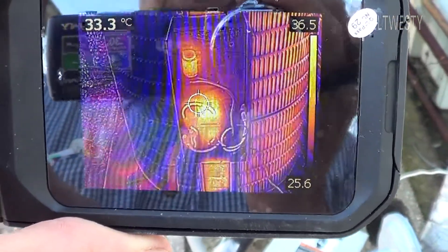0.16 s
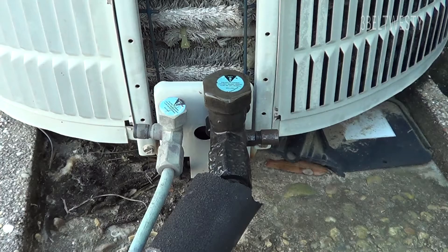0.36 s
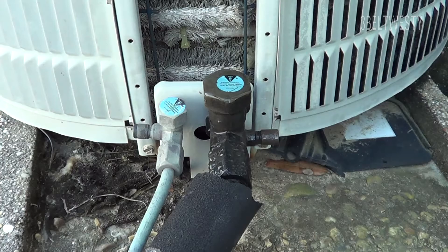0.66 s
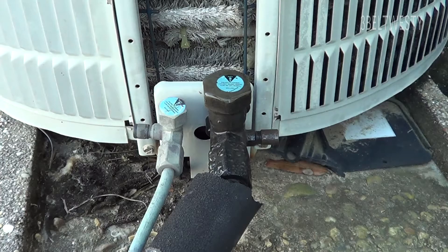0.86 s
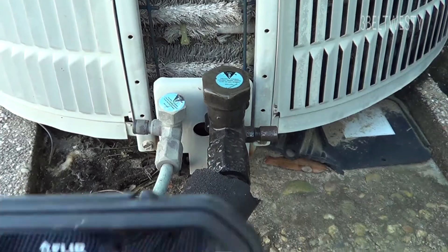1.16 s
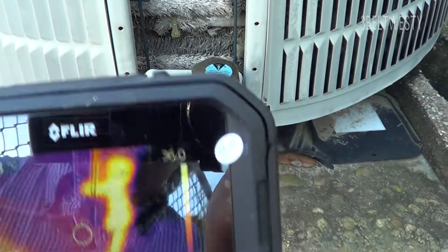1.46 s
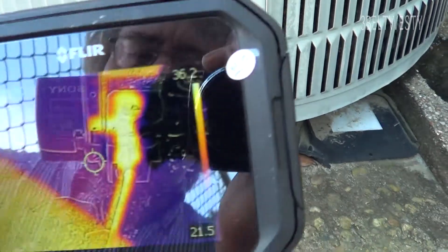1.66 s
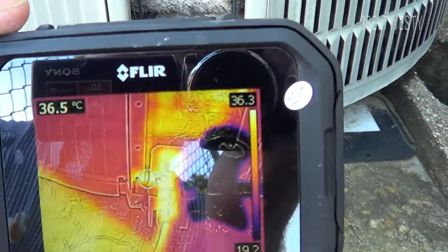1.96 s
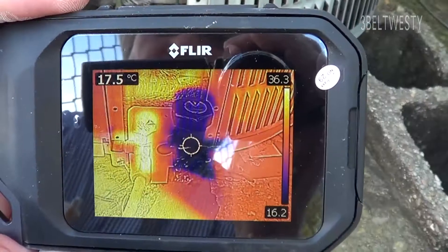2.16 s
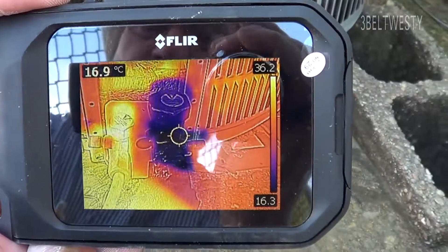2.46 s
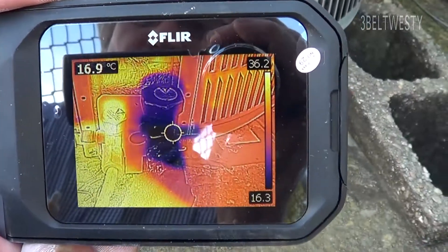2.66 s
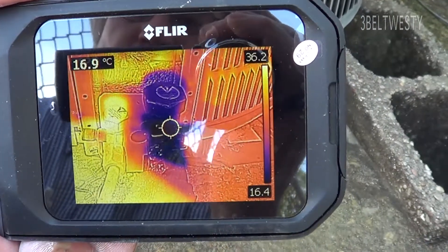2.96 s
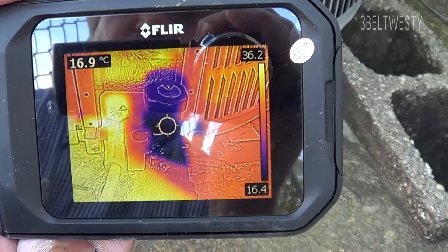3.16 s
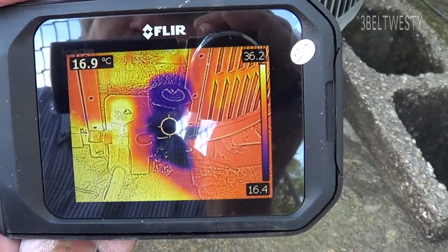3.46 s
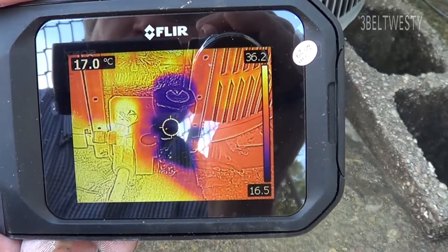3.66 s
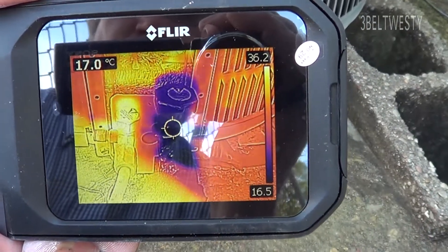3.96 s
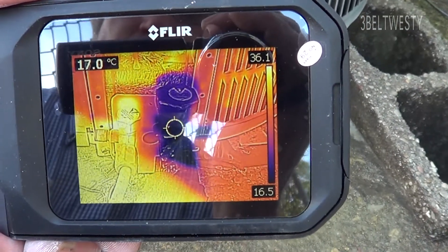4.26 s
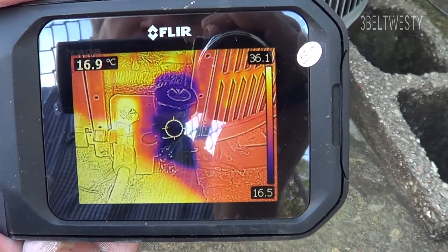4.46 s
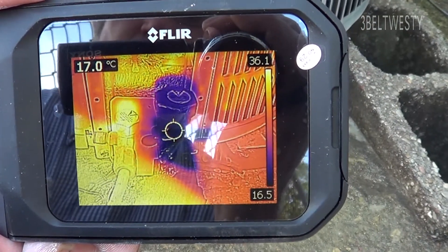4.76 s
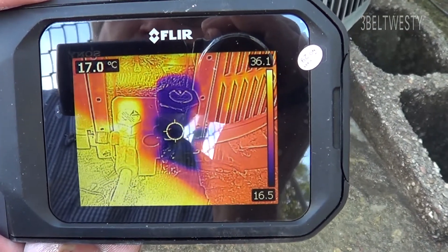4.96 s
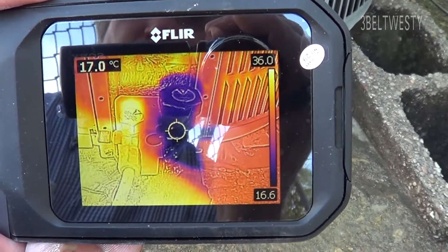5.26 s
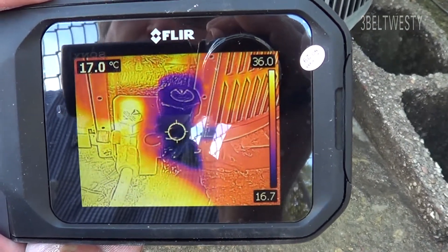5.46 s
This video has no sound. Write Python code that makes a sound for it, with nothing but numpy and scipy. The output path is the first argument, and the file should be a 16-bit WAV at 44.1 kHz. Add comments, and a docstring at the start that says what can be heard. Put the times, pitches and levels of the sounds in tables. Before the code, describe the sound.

A fan unit blows continuously near the microphone, its broad airy roar mixed with motor hum, electrical buzz and slightly throbbing compressor whine. Soft low gusts buffet the first two passages. Two very short complete silences separate three microphone positions; the tone shifts subtly as a held object comes near, and the last, longest passage is steady and wind-free.

```python
"""An outdoor air-conditioner runs steadily, heard close by from three microphone positions in turn.
At the first, noise shaped by cabinet resonances makes the fan's rush; sine tones make the fan motor's hum,
the mains buzz and the throbbing compressor; low noise in opposite phase makes the buffeting wind.
A short silence follows, then the second position, where a hand-held object rises and alters the tones
while gusts go on; after another silence the third position is heard without wind to the end."""
import sys
import numpy as np
from scipy import signal
from scipy.fft import rfft, irfft, next_fast_len
from scipy.io import wavfile
from scipy.ndimage import uniform_filter1d

SR = 44100
rng = np.random.default_rng(int(sys.argv[2]) if len(sys.argv) > 2 else 0)


def persist_wave(psi):
    """Save psi, clipped to +-1, as 16-bit WAV."""
    counts = np.round(np.clip(psi, -1, 1) * 32767).astype(np.int16)
    wavfile.write(sys.argv[1], SR, np.atleast_2d(counts).T)


N = 247401
T = np.arange(N) / SR  # time in s
MAINS_HZ, COMPRESSOR_HZ = 59.997, 58.39  # mains frequency; shaft speed in turns per second
EDGE_HZ = 15700  # upper limit of the sound band
BREEZE_DB, GUST_RISE_S = -42, .03  # wind level between gusts; time scale of a gust's swell

# All source levels are those before the gain control in record().
# Sounding span of each microphone position: start_s, end_s
POSITION_SPANS = [(-1, .221), (.3335, 1.98575), (2.1715, 9)]
# Passage of the hand-held object from clear to shading the microphone: start_s, end_s
SHADING_SPAN = (.85, 1.35)
# Spectrum of the wind noise: frequency_hz, relative_density_db (per Hz)
WIND_SPECTRUM = [(15, -25.5), (40, -14.5), (75, -6.5), (115, 2.5), (200, 0.5), (300, -10), (450, -19),
                 (800, -49)]
# Gusts of wind from the fan on the microphone: peak_s, level_db, fall_s
WIND_GUSTS = [(.13, -39, .05), (.4, -32, .05), (.48, -31, .05), (.57, -34, .07), (.85, -38, .1),
              (1.03, -34, .04), (1.16, -31, .03), (1.45, -42, .04), (1.62, -26, .025), (1.74, -34, .05),
              (1.93, -37, .04)]
# Compressor tones: shaft_multiple, first_db, second_open_db, second_shaded_db, third_db, left_minus_right_db
SHAFT_TONES = [(23, -40, -39, -42, -43, -1), (59, -63, -46, -49, -42, -2), (67, -50, -55, -51, -49, -4),
               (73, -66, -55, -67, -50, 0), (134, -69, -56, -63, -51, 1), (143, -67, -53, -54, -56, 2),
               (147, -64, -52, -58, -55, 7), (155, -63, -52, -52, -51, -2), (156, -67, -67, -57, -52, 3),
               (165, -69, -43, -47, -55, 4), (166, -69, -43, -50, -51, 1), (167, -53, -49, -51, -54, 1),]
# Strongest buzz partials: multiple_of_twice_mains, then the same five level columns in dB
BUZZ_PARTIALS = [(14, -55, -43, -46, -43, 1), (20, -45, -49, -46, -45, 2), (23, -43, -56, -56, -58, 0),
                 (31, -55, -52, -52, -48, 0), (48, -47, -59, -54, -53, 3), (50, -51, -51, -51, -48, 3),
                 (51, -42, -49, -51, -47, 8), (52, -69, -43, -49, -44, 2), (53, -43, -46, -49, -49, 7),
                 (54, -46, -43, -44, -55, 8), (55, -51, -59, -56, -50, 5), (56, -52, -51, -45, -47, 5),
                 (57, -49, -59, -55, -50, 8), (59, -51, -48, -53, -57, 8), (60, -42, -59, -45, -41, 6),
                 (61, -52, -46, -52, -40, 4), (62, -43, -44, -44, -61, 8), (63, -54, -49, -70, -47, 0),
                 (64, -55, -54, -50, -74, 5), (65, -68, -49, -51, -49, 3), (66, -44, -53, -50, -49, 3),
                 (67, -49, -63, -57, -52, 7), (68, -66, -47, -52, -47, 4), (69, -47, -51, -52, -46, 5),
                 (71, -49, -53, -52, -64, 7), (78, -47, -60, -71, -52, -1), (80, -73, -54, -61, -50, -3),
                 (81, -52, -57, -63, -48, 6), (82, -51, -48, -45, -49, 5), (84, -45, -50, -47, -57, 1),
                 (85, -49, -72, -50, -70, 2), (87, -49, -48, -55, -58, 0)]
# Outline about which the weaker buzz partials scatter: frequency_hz, level_db
WEAK_BUZZ_OUTLINE = [(2500, -62.5), (4500, -58.5), (6000, -63.5), (8400, -59), (10000, -55), (11000, -61),
                     (12500, -67), (13800, -65), (15500, -73)]
# Fan motor hum and neighbouring tones: frequency_hz, then the same five level columns in dB
FAN_TONES = [(216.3, -47, -47, -47, -46, 0), (615.5, -42, -34, -34, -34, 1), (624, -45, -34, -34, -42, 1),
             (627, -45, -40, -40, -36, 2), (631.2, -27, -24, -24, -23, 2), (638, -40, -31, -31, -37, 2),
             (649.2, -38, -30, -30, -28.5, 1), (663, -45, -35, -35, -37, 1), (692, -40, -35, -35, -38, 1),
             (703.4, -34, -40, -40, -34, 1), (1088.9, -49, -52, -52, -42, 0),
             (1122.8, -42, -45, -45, -42, 2), (1147.5, -46, -41, -41, -39, 2),
             (1183.7, -44, -44, -44, -43, -2), (1201.5, -47, -55, -55, -46, 2),
             (1219.7, -45, -51, -51, -45, -1), (1255.7, -38, -43, -43, -38, 2),
             (1262.4, -43, -41, -41, -42, 0), (1813, -46, -46, -46, -40, 1), (1827, -46, -41, -41, -43, 1),
             (2043.6, -48, -44, -44, -44, 0)]
# Spectrum of the air rush, one list per position: frequency_hz, relative_density_db (per Hz)
RUSH_SPECTRA = [
    [(18, -85), (30, -48), (213, -12), (270, -17), (421, -11.5), (519, -18.5), (561, -8.5), (692, -3.5),
     (830, -14.5), (1230, -12), (1480, -19.5), (2360, -23.5), (2560, -29), (10500, -30.5), (15500, -54)],
    [(18, -72), (30, -44), (103, -20), (178, -18.5), (292, -10), (443, -13), (591, -6.5), (639, -4),
     (898, -11), (2130, -19), (2560, -24.5), (3320, -26.5), (8970, -30.5), (9960, -28.5), (15500, -57)],
    [(18, -73), (30, -47), (103, -19), (182, -18.5), (284, -9.5), (492, -12.5), (639, -4), (1020, -13),
     (1870, -17), (2560, -24), (3320, -26.5), (5750, -29.5), (7470, -29), (9960, -31.5), (15500, -55)],
]
# Rms of the rush before patches and flicker, one per position: level_db
RUSH_LEVELS = [-16, -16, -16]
# Cabinet and grille resonances and hollows in the rush: frequency_hz, width_hz, lift_db
CABINET_MODES = [(283, 90, 2), (484, 55, -7), (632.5, 25, 4.5), (755, 60, 4), (977, 32, 3), (1303, 62, -1),
                 (1680, 60, -3.5), (1823, 50, 7.5), (1950, 60, 1.5), (2086, 210, 4.5), (2224, 80, 4),
                 (2540, 200, -2.5), (3390, 330, 4.5), (3300, 50, 3.5), (3760, 180, 3), (8400, 300, -2.5),
                 (9800, 300, 5), (13800, 700, 4), (14500, 500, -5.5)]
# Treble lifts and hollows of each position, one list per position: frequency_hz, width_hz, lift_db
LOCAL_MODES = [
    [(2900, 500, 0.5), (3450, 200, -3.5), (9800, 700, -4), (11800, 400, -4), (12250, 300, 4.5),
     (13000, 400, -4), (13900, 400, -4), (14700, 700, 4)],
    [(9900, 370, -1.5), (11200, 700, -1.5), (13000, 300, -2), (14800, 1500, 3)],
    [(12900, 300, -2), (14250, 300, -6), (14850, 300, 1), (15300, 400, -6)],
]
# Left-right likeness of the rush: frequency_hz, correlation (no unit, held at 1)
PORT_LIKENESS = [(40, 0.81), (100, 0.94), (250, 0.96), (400, 0.75), (640, 0.92), (1100, 0.75), (1800, .88),
                 (2500, 0.8), (3200, 0.81), (7500, 0.62), (10200, 0.81), (11200, 1.07)]
# Level difference between the ports in the rush: frequency_hz, left_minus_right_db
PORT_LEAN = [(60, 0.5), (130, 1.5), (220, -0.2), (400, -1.5), (800, 1.2), (1500, .2), (3200, -0.5),
             (6000, -1), (11000, 0)]
# Phase lead of the left port: frequency_hz, lead_rad
PORT_LEAD = [(40, .17), (120, 0.27), (250, 0.23), (420, .53), (860, 0.4), (1810, .2), (3400, 0.23),
             (6000, 0.18), (8000, 0)]

PORT_SIGNS = np.array([[.5], [-.5]])  # shares a left-right difference between the two ports


def gain_of(db):
    """Logarithmic level: decibels become an amplitude ratio."""
    return 10 ** (np.asarray(db) / 20)


def evened(x):
    """Normalisation: the signal is scaled to rms 1."""
    return x / np.sqrt(np.mean(x ** 2) + 1e-20)


def read(points, hz):
    """Interpolation of a frequency table on a nearly logarithmic axis."""
    f, value = np.transpose(points)
    return np.interp(np.log(hz + 1), np.log(f + 1), value)


def bumps(modes, hz):
    """Resonance: each mode lifts or lowers the level in dB along a Lorentzian curve."""
    return sum(db / (1 + (2 * (hz - f) / width) ** 2) for f, width, db in modes)


def position(t):
    """Succession: index of the microphone position, changing 40 ms into each silence."""
    ends = [POSITION_SPANS[0][1], POSITION_SPANS[1][1]]
    return np.searchsorted(ends, t - .04)


def drift(hz):
    """Random modulation: sines up to hz in random phase sum to a fluctuation of rms 1."""
    rates = np.geomspace(hz / 20, hz, 20)[:, None]
    coarse = np.arange(0, T[-1] + .02, .01)
    phase = 2 * np.pi * (rates * coarse + rng.random(rates.shape))
    wave = (np.sin(phase) / np.sqrt(rates)).sum(0)
    return np.interp(T, coarse, evened(wave))


def tone(hz, db, lean_db):
    """Simple harmonic motion: a sine reaches two ports with a level and a phase difference."""
    phase = 2 * np.pi * (hz * T + rng.random())
    amplitude = np.sqrt(2) * gain_of(db + PORT_SIGNS * lean_db)
    return amplitude * np.sin(phase + PORT_SIGNS * read(PORT_LEAD, hz))


def tones(rows, unit_hz, waver_db, waver_hz):
    """Superposition: steady partials add, each wavering about a level set by position and shading."""
    where = position(T)
    shaded = np.interp(T, SHADING_SPAN, [0, 1])
    column = np.where(where == 1, 1 + shaded, 3 * (where == 2))
    total = 0
    for multiple, *levels_db, lean_db in rows:
        level_db = np.interp(column, range(len(levels_db)), levels_db)
        level_db = level_db + waver_db * drift(waver_hz)
        total = total + tone(unit_hz * multiple, level_db, lean_db)
    return total


def wind(lumpy_db=2.5):
    """Wind pressure on a microphone: lumpy low noise, breeze and gusts, in opposite phase at the ports."""
    size = next_fast_len(N)
    colour = gain_of(read(WIND_SPECTRUM, np.fft.rfftfreq(size, 1 / SR)))
    low = irfft(rfft(rng.standard_normal(size)) * colour, size)[:N]
    # the breeze lasts to the end of the second position
    level = gain_of(BREEZE_DB) * (T < POSITION_SPANS[1][1])
    for peak_s, db, fall_s in WIND_GUSTS:
        spread_s = np.where(T < peak_s, GUST_RISE_S, fall_s)
        level = level + gain_of(db) * np.exp(-((T - peak_s) / spread_s) ** 2)
    level = level * gain_of(lumpy_db * drift(40))
    return np.array([[1], [-1]]) * level * evened(low)


def compressor(depth=0.25):
    """Amplitude modulation: shaft multiples throb at twice the slip between field and rotor."""
    slip_hz = MAINS_HZ - COMPRESSOR_HZ
    throb = 1 + depth * np.sin(2 * np.pi * 2 * slip_hz * T)
    return evened(throb) * tones(SHAFT_TONES, COMPRESSOR_HZ, waver_db=1.5, waver_hz=2.6)


def buzz(scatter_db=3.0):
    """Magnetic vibration: laminations shake at twice the mains rate, a comb strongest in the treble."""
    comb_hz = 2 * MAINS_HZ
    scatter = scatter_db * rng.standard_normal((131, 4))
    strong = [row[0] for row in BUZZ_PARTIALS]
    weak = [(k, *(read(WEAK_BUZZ_OUTLINE, comb_hz * k) + scatter[k]), 0)
            for k in range(21, 131) if k not in strong]
    return tones(list(BUZZ_PARTIALS) + weak, comb_hz, waver_db=.7, waver_hz=5)


def fan_motor():
    """Line spectrum of a rotating machine: a strong hum among weaker neighbouring tones."""
    return tones(FAN_TONES, 1, waver_db=2.0, waver_hz=5)  # the table is in Hz


def rush(patchy_db=1.07, flicker_db=0.45):
    """Turbulence: random short-time spectra, filtered by resonances, with patches and a shared flicker."""
    window, hop = 2048, 512  # samples
    frames, hz = N // hop + 5, np.fft.rfftfreq(window, 1 / SR)
    t = np.arange(frames) * hop / SR
    a, b, c, d, patches = rng.standard_normal((frames, len(hz), 5)).T
    patches = uniform_filter1d(patches, size=20, axis=0)  # across frequency
    patches = evened(uniform_filter1d(patches, size=6, axis=1))  # across time

    colours = []
    for spectrum, db, local in zip(RUSH_SPECTRA, RUSH_LEVELS, LOCAL_MODES):
        shape = gain_of(read(spectrum, hz) + bumps(CABINET_MODES + local, hz))
        colours.append(gain_of(db) * evened(shape * (hz < EDGE_HZ)))

    # the right port shares part of the left noise and adds its own
    same = np.clip(read(PORT_LIKENESS, hz), -1, 1)[:, None]
    left = a + 1j * b
    right = same * left + np.sqrt(1 - same ** 2) * (c + 1j * d)
    lean = gain_of(PORT_SIGNS * read(PORT_LEAN, hz))
    lead = np.exp(1j * PORT_SIGNS * read(PORT_LEAD, hz))
    spectra = np.array([left, right]) * (lean * lead)[:, :, None]

    overlap = window - hop
    plain = 1 / np.std(signal.istft(left, nperseg=window, noverlap=overlap)[1])  # flat noise to rms 1
    spectra *= plain * np.array(colours).T[:, position(t)] * gain_of(patchy_db * patches)
    air = signal.istft(spectra, nperseg=window, noverlap=overlap)[1][:, :N]
    return gain_of(flicker_db * drift(30)) * air


def scene():
    """Superposition of wind, compressor, mains buzz, fan motor and rushing air."""
    return wind() + compressor() + buzz() + fan_motor() + rush()


def record(dry, hold_db=-15.0, share=0.8, smooth_s=0.0085):
    """Level compression: a quick gain control, then silences between positions and a band limit."""
    keep = np.exp(-1 / (smooth_s * SR))
    start_power = gain_of(2 * hold_db)
    power = signal.lfilter([1 - keep], [1, -keep], (dry ** 2).mean(0), zi=[start_power])[0]
    # share is the part of each departure from hold_db that is evened out
    held = dry * gain_of(share * (hold_db - 10 * np.log10(power)))
    running = sum((T >= start) & (T < end) for start, end in POSITION_SPANS)
    lowpass = signal.firwin(511, EDGE_HZ, window=("kaiser", 9), fs=SR)
    return signal.oaconvolve(held * running, lowpass[None], "same")


dry = scene()
out = record(dry)
persist_wave(out)
```